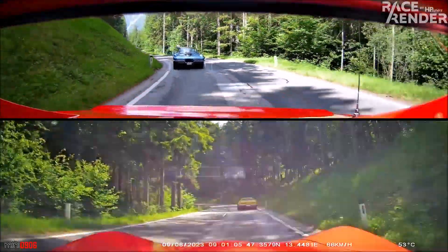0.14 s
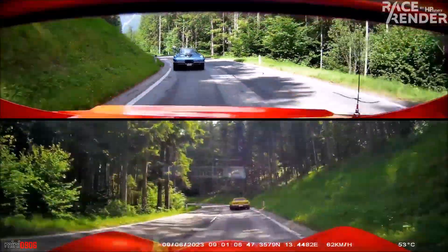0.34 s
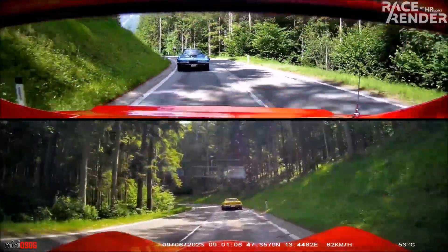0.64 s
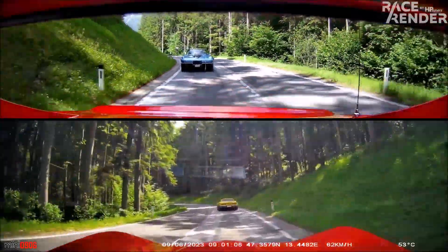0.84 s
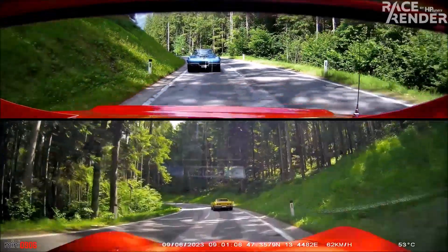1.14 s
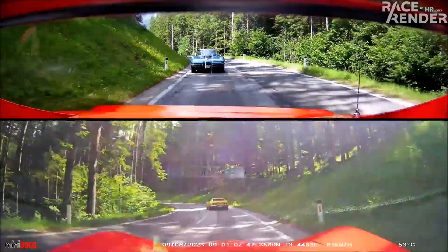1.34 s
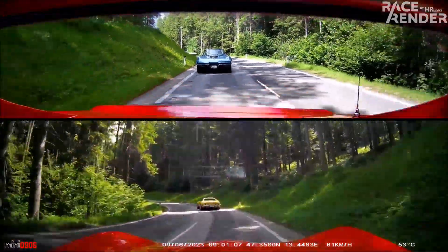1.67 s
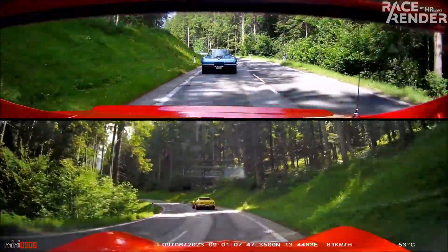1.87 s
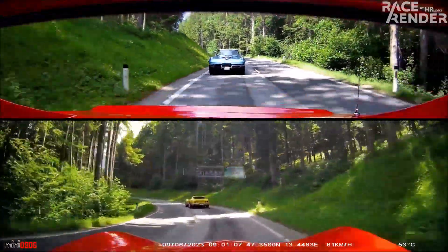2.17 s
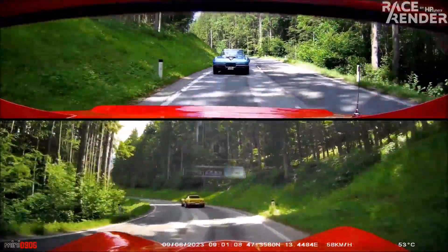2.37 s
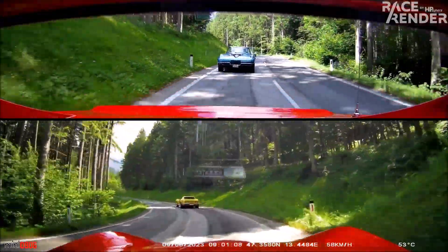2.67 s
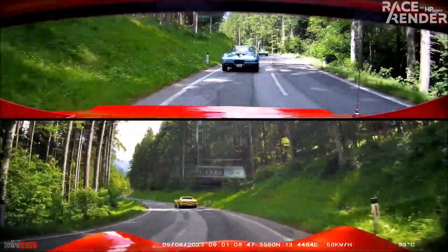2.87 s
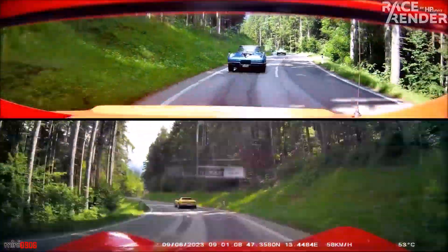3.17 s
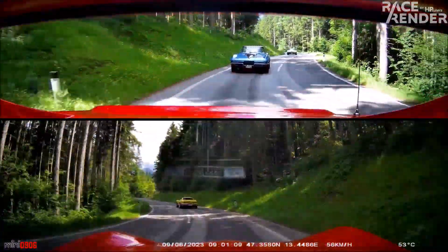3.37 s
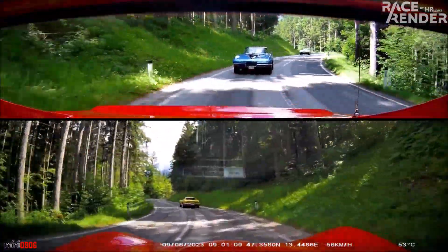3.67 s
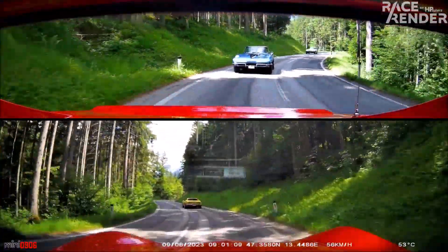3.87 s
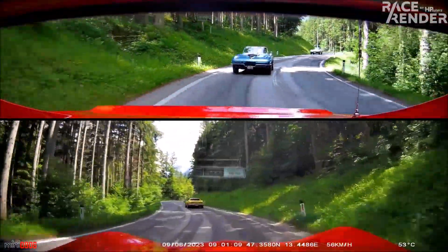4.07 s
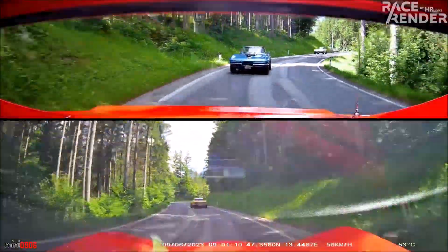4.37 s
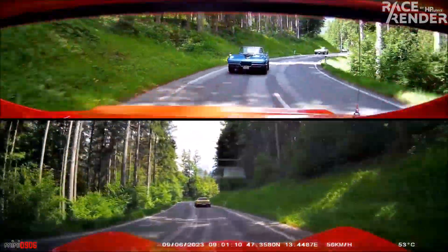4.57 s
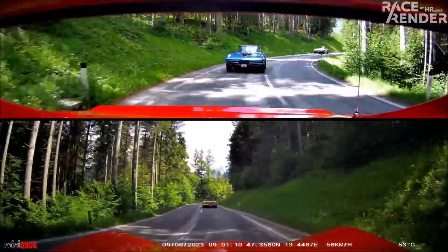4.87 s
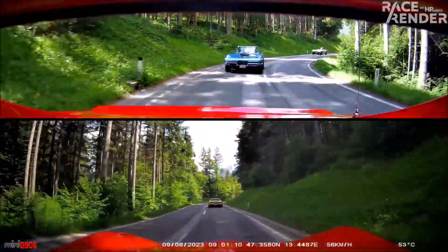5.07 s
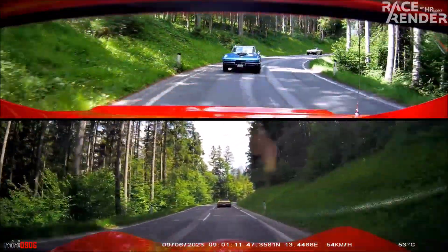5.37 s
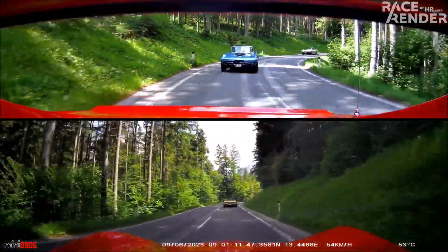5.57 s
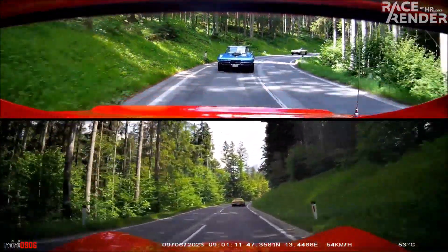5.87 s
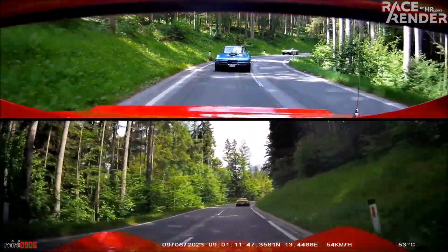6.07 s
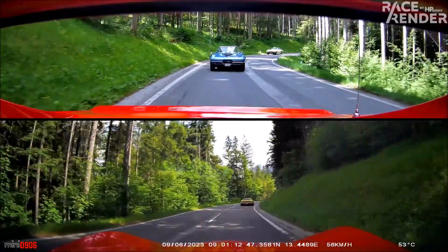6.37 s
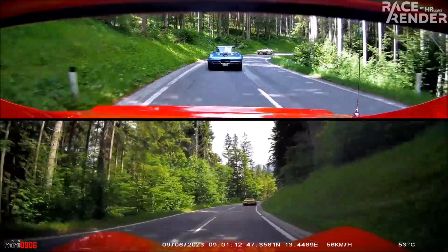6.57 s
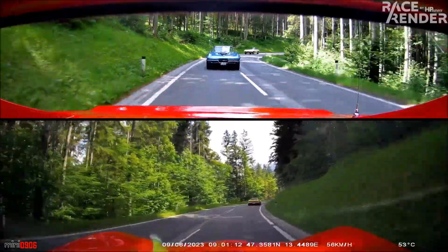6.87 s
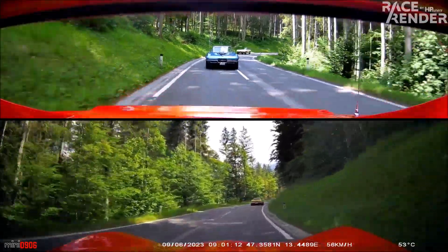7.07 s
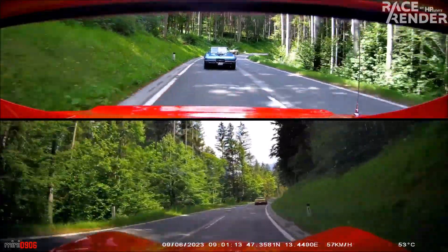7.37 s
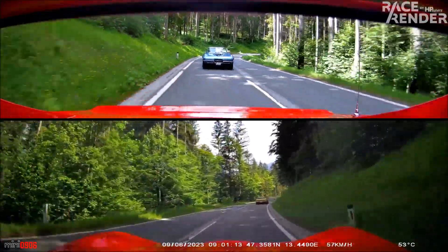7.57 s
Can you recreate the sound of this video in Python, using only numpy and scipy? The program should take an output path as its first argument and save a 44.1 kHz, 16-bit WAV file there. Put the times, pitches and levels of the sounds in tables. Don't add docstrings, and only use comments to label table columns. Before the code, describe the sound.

Close, boxy sound inside a car on a winding country road, through a small dash camera. From 0 to 3.6 s the big V8 coasts off throttle: a soft low hum near 89 Hz sinking to 81 Hz, under continuous tyre and wind roar and body rumble. Small plastic trim ticks cluster around 0.7-0.9 s, with faint single ones at 1.5, 2.3, 2.7, 2.9 and 3.2 s. At about 3.6 s the throttle opens; within half a second the engine leaps to a loud, uneven, throbbing boom with rough gas rush, climbing to about 139 Hz by 4.7 s. It drones nearly level until 7.4 s, then surges upward to about 163 Hz at the end. Sharper ticks click at 4.7 and 5.1 s. A thin steady whine near 7.7 kHz, faint hiss bursts roughly each second, longer near the end, and tiny treble dropouts colour everything.

```python
import sys
import numpy as np
from scipy import signal
from scipy.fft import rfft, irfft, next_fast_len
from scipy.io import wavfile
from scipy.ndimage import uniform_filter1d, map_coordinates

SR = 44100
rng = np.random.default_rng(int(sys.argv[2]) if len(sys.argv) > 2 else 0)


def invert_db(x):
    u = np.asarray(x, float) / 20
    return 10 ** u


def generate_wav(sig):
    pcm = np.round(np.clip(np.atleast_2d(sig).T, -1, 1) * 32767).astype(np.int16)
    wavfile.write(sys.argv[1], SR, pcm)


N = 341334
TIME = np.arange(N) / SR
CAMERA_RATE_HZ = 16000


def unit(x):
    return x / np.sqrt(np.mean(x ** 2) + 1e-20)


def along(points, hz):
    point_hz, value = np.transpose(points)
    return np.interp(np.log(hz + 1), np.log(point_hz + 1), value)


def wobble(rate, step=1):
    coarse = TIME[::256]
    knots = rng.standard_normal(int(N * rate / SR) + 4)
    return np.interp(TIME[::step], coarse, map_coordinates(knots, [coarse * rate]))


def filtered(x, response):
    m = next_fast_len(N + SR // 2)
    return irfft(rfft(x, m) * response(np.fft.rfftfreq(m, 1 / SR)), m)[:N]


def rush(spectrum, patchy_db):
    z = signal.stft(rng.standard_normal(N + 2048), nperseg=1024)[2]
    patches = uniform_filter1d(rng.standard_normal(z.shape), size=6, axis=0)
    patches = uniform_filter1d(patches, size=8, axis=1)
    noise = signal.istft(z * invert_db(patchy_db * unit(patches)), nperseg=1024)[1][:N]
    return unit(filtered(noise, lambda hz: invert_db(along(spectrum, hz))))


# time in seconds, firing rate in Hz, throttle from 0 to about 1.
ENGINE_COURSE = [(0, 89.13, 0), (1.5, 86.37, 0), (3.55, 81.1, 0), (3.62, 85.4, 0), (3.68, 93, 0.26),
                 (3.74, 104, 0.6), (3.8, 109.5, 0.69), (3.95, 116.9, 0.88), (4.05, 121.3, 0.97),
                 (4.16, 122.5, 1), (4.35, 134.4, .96), (4.7, 139, 1), (5.6, 140, .97), (7.1, 142.3, 1),
                 (7.38, 143.3, 0.98), (7.47, 145.9, 0.95), (7.74, 163.3, 1.08)]


def drive():
    s, firing_hz, throttle = np.transpose(ENGINE_COURSE)
    return np.interp(TIME, s, firing_hz), np.interp(TIME, s, throttle)


# frequency in Hz, density in dB per Hz.
ROAR_SPECTRUM = [(150, -16), (240, -9), (312, -2.5), (403, -13.5), (460, -6.5), (640, -12), (755, -6),
                 (826, -15.5), (970, -6), (1150, -10), (1700, -21), (2300, -35), (3600, -36.5),
                 (4200, -46.5), (5100, -43.5), (6800, -52.5)]
# frequency in Hz, density in dB per Hz.
RUMBLE_SPECTRUM = [(15, -23.5), (45, -15.5), (60, -7), (100, -3), (170, 2.5), (260, -3), (330, -22),
                   (450, -45.5)]


def road():
    roar_db = -32 + 0.17 * wobble(2.1) + 0.72 * wobble(12)
    roar = invert_db(roar_db) * rush(ROAR_SPECTRUM + [(8000, -65.5)], patchy_db=1)
    throttle = drive()[1]
    rumble_db = -37 + 6 * throttle + 1.2 * wobble(7)
    return roar + invert_db(rumble_db) * rush(RUMBLE_SPECTRUM + [(900, -120)], patchy_db=0.5)


# start in seconds, peak level in dB, ring frequency in Hz,
# 60 dB decay time in seconds, share of broad crack as a ratio.
TRIM_TICKS = [(.7337, -38, 2570, .007, 0.22), (.84, -40, 2500, 0.0072, 0.34), (.856, -40, 2870, 0.07, .05),
              (.862, -50, 3730, .09, .05), (.9044, -50, 4800, .01, 2.6), (1.5314, -39.5, 3291, 0.017, 0.84),
              (2.3161, -42, 2210, 0.026, .3), (2.6798, -48, 3300, 0.012, 0.85),
              (2.8594, -50, 3530, 0.022, .5), (3.2026, -49, 2370, 0.02, .2),
              (4.7067, -32, 3000, .003, 0.54), (5.017, -52, 6030, 0.007, 0.93),
              (5.0739, -24.5, 2650, 0.0035, 0.43)]


def trim():
    out, t = np.zeros(N + SR), np.arange(SR // 8) / SR
    for s, db, hz, t60, share in TRIM_TICKS:
        onset = 1 - np.exp(-t / 0.000097)
        ring = invert_db(-60 * t / t60) * np.sin(2 * np.pi * hz * t) * onset
        dull_noise = uniform_filter1d(rng.standard_normal(len(t)), size=6)
        crack = share * invert_db(-60 * t / 0.02) * dull_noise
        out[round(s * SR):][:len(t)] += invert_db(db + 6) * (ring + crack)
    return out[:N]


# level of one cylinder in dB, in firing order.
CYLINDER_PUFFS = [-14, -2.5, 3.5, -7, -0.5, -7.5, -10.5, 2.5]
# frequency in Hz, density in dB per Hz.
GAS_SPECTRUM = [(200, -35.5), (330, -4.5), (420, -5), (555, -3.5), (740, -10), (820, -7), (975, -8),
                (1260, -16), (1510, -10), (1850, -19.5), (2340, -28.5), (2840, -24.5), (3600, -31),
                (4200, -41), (5100, -38), (6800, -48.5)]


def gas_rush():
    firing_hz, throttle = drive()
    firings = np.cumsum(firing_hz) / SR
    puff_db = np.take(CYLINDER_PUFFS, firings.astype(int) % len(CYLINDER_PUFFS))
    puffs = invert_db(puff_db - 9.8 * (firings % 1))
    flow = rush([(100, -120)] + GAS_SPECTRUM + [(8000, -61)], patchy_db=1.5)
    gas = unit(flow * (1 + 0.1 * unit(puffs)))
    return invert_db(-32 - 16.2 * (1 - throttle) + 0.3 * wobble(4)) * gas


# order, coasting level in dB, pulling level in dB.
LOW_ORDERS = [(4, -56, -39), (5, -60.5, -40), (6, -31, -37.5), (7, -47, -41), (9, -47, -58),
              (10, -37.5, -42.5), (12, -48, -39.5), (14, -64.5, -36), (15, -49.5, -55), (16, -42, -43.5)]
# frequency in Hz, level in dB.
CABIN_BOOM = [(80, -30), (93, -24.5), (104, -20.5), (118, -17.3), (128, -19.5), (134, -23), (140, -21.5),
              (156, -20)]
# frequency in Hz, level in dB.
BANK_MODES = [(150, -47), (172, -28.5), (190, -26.5), (205, -25.5), (222, -33.5), (238, -31), (258, -49)]
# frequency in Hz, gain in dB.
PIPE_MODES = [(280, 0), (390, 1.5), (420, -6), (460, 2), (490, 0), (525, 3.5), (565, 2), (585, -1.5),
              (700, -7.5), (745, 2.5), (800, -13.5)]


def order_levels(firing_hz, throttle, step):
    shut = 1 - throttle
    overrun_db = -8.5 * np.clip(1 - 4.5 * throttle, 0, 1)
    levels = [(8, along(CABIN_BOOM, firing_hz) + overrun_db)]
    for k in (11, 13):
        levels.append((k, along(BANK_MODES, k * firing_hz / 8) - 17.5 * shut))
    surge_db = 90 * np.clip(throttle - 1, 0, 1)
    for k, coast, load in LOW_ORDERS:
        surge_sign = (k in (4, 6)) - (k in (12, 14))
        db = coast + throttle * (load - coast) + 1.5 * wobble(6.4, step)
        levels.append((k, db + surge_db * surge_sign))
    for k in range(17, 45):
        passing_db = 0.85 * along(PIPE_MODES, k * firing_hz / 8)
        odd_db = -4 * (k % 2)
        fourth_db = 4 * (k in (31, 32, 34))
        pair_db = 2.5 * (k % 4 == 2)
        db = -44 + odd_db + fourth_db + pair_db + passing_db
        levels.append((k, db - 17.5 * shut + 1.5 * wobble(3, step)))
    return levels


def boom():
    step = 8
    firing_hz, throttle = [curve[::step] for curve in drive()]
    cycle = np.cumsum(firing_hz) * step / SR / 8
    cycle = cycle + 0.0004 * wobble(15, step)
    out = 0
    for k, db in order_levels(firing_hz, throttle, step):
        start = ((k - 1) % 3 - 1) / 6 if k <= 16 else rng.random()
        start += 0.5 * ((k % 2 == 1 and k % 3 != 2) or k == 4)
        turns = k * cycle + start + 0.012 * wobble(12, step)
        out = out - invert_db(db + 0.52 * wobble(14, step)) * np.sqrt(2) * np.cos(2 * np.pi * turns)
    return filtered(signal.resample_poly(out, step, 1)[:N], lambda hz: 1 / (1 + (62 / (hz + 1)) ** 10))


def engine():
    return boom() + gas_rush()


def scene():
    return (road() + trim() + engine())[None]


# start in seconds, length in seconds, level in dB.
STORAGE_WRITES = [
    (0.302, 0.11, -55),
    (1.275, 0.12, -55),
    (2.263, .12, -54.5),
    (3.24, .14, -57),
    (4.23, .12, -53.5),
    (5.21, 0.16, -57),
    (6.228, .11, -54.5),
    (6.988, 0.33, -54),
    (7.45, 0.68, -56),
]
# frequency in Hz, density in dB per Hz.
HISS_SPECTRUM = [(1500, -24), (2500, 3), (4200, -2.5), (5200, 0.5), (6500, -8), (7900, -11.5)]


def storage():
    level = 0
    for s, length, db in STORAGE_WRITES:
        active = (TIME > s) * (TIME < s + length)
        level = level + invert_db(db - 5 * (TIME - s) / length) * active
    return uniform_filter1d(level, size=300) * rush([(500, -120)] + HISS_SPECTRUM, patchy_db=4)


# centre in seconds, length in seconds, depth in dB.
TREBLE_LOSSES = [(0.182, 0.034, -8), (0.787, 0.014, -15), (0.863, 0.016, -13), (3.126, 0.021, -11),
                 (3.732, 0.022, -14), (4.131, 0.014, -8), (4.197, 0.013, -6), (4.222, 0.022, -13),
                 (4.528, 0.011, -9), (4.746, 0.017, -4), (5.813, 0.016, -9), (6.205, 0.019, -15),
                 (6.36, 0.016, -1), (6.507, 0.013, -21)]


def lose_treble(x):
    treble = filtered(x, lambda hz: 1 / (1 + (1750 / (hz + 1)) ** 12))
    loss_db = sum(db * np.exp(-((TIME - s) / length * 2) ** 4) for s, length, db in TREBLE_LOSSES)
    return x - treble * (1 - invert_db(loss_db))


# frequency before mirroring in Hz, gain in dB.
MIRROR_LEAK = [(250, -58), (400, -40), (1000, -27.5), (2000, -26.5), (4000, -13), (5200, -10.5),
               (5900, -5.5), (6500, -2), (7700, 4)]


def mirror_image(x):
    leak = filtered(x, lambda hz: invert_db(along(MIRROR_LEAK, hz)))
    leak = leak * 2 * np.cos(2 * np.pi * CAMERA_RATE_HZ * TIME)
    return filtered(leak, lambda hz: (hz > CAMERA_RATE_HZ / 2) & (hz < 15750))


def starved(x):
    hz, _, z = signal.stft(x, SR, nperseg=1024)
    level = uniform_filter1d(np.abs(z) ** 2, size=12, axis=0)
    level = uniform_filter1d(level, size=3, axis=1)
    usual = signal.medfilt(level[(hz > 4500) & (hz < 6500)].mean(axis=0), 61)
    beside_whine = ((hz > 7000) & (hz < 9900))[:, None]
    weak = (level < usual * invert_db(2 * -7.5)) & beside_whine
    return signal.istft(z * ~weak, SR, nperseg=1024)[1][:N]


def whine():
    hz = 7692.3
    line = np.sin(2 * np.pi * hz * TIME)
    image = invert_db(-12) * np.sin(2 * np.pi * (CAMERA_RATE_HZ - hz) * TIME)
    flutter_db = 0.37 * wobble(7.4) + 0.41 * wobble(75) + 0.44 * wobble(150)
    return invert_db(-44.5 + 2 * drive()[1] + flutter_db) * (line + image)


def band_limit(x):
    return signal.sosfilt(signal.butter(12, 16740, fs=SR, output="sos"), x)


def record(dry):
    x = filtered(dry[0] + storage(), lambda hz: hz < CAMERA_RATE_HZ / 2)
    x = lose_treble(x)
    x = starved(x + mirror_image(x))
    offset = -0.021
    mix = (x + whine() + offset)[None]
    return band_limit(mix)


dry = scene()
out = record(dry)
generate_wav(out)
```